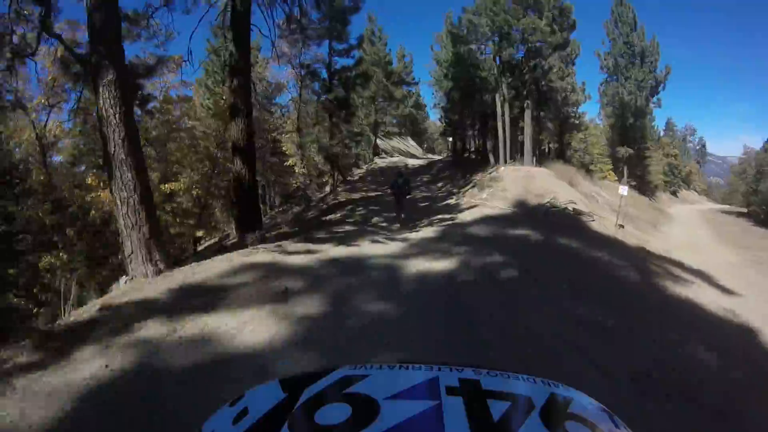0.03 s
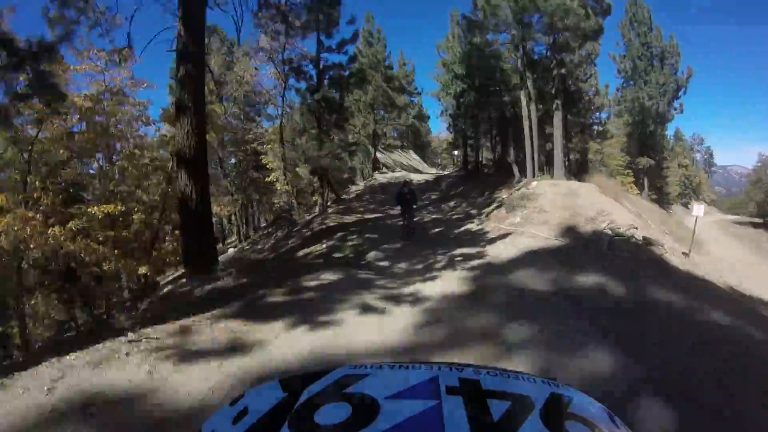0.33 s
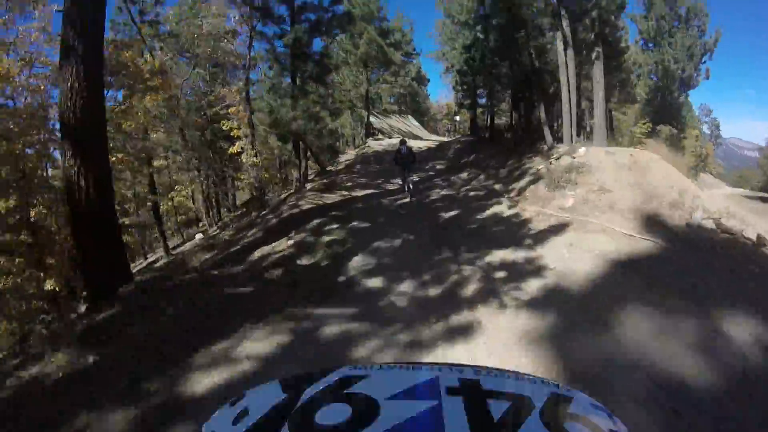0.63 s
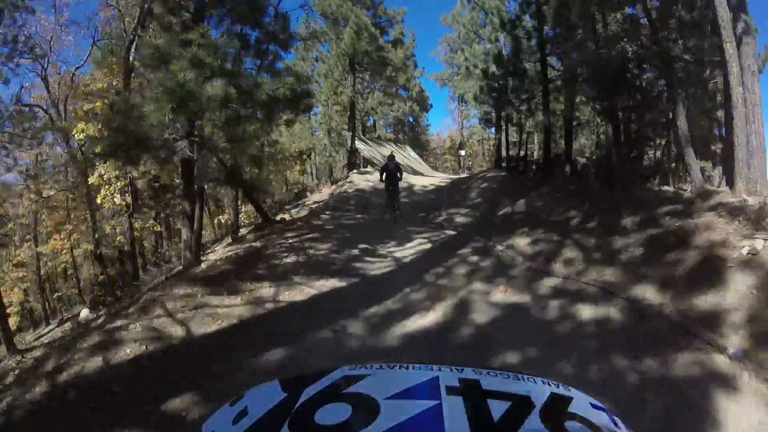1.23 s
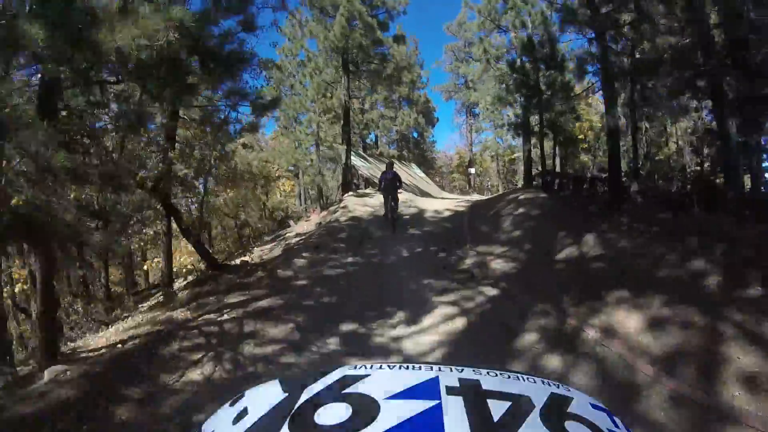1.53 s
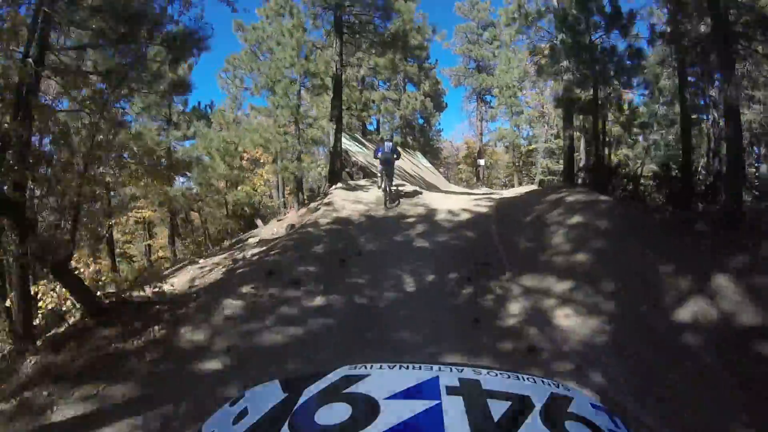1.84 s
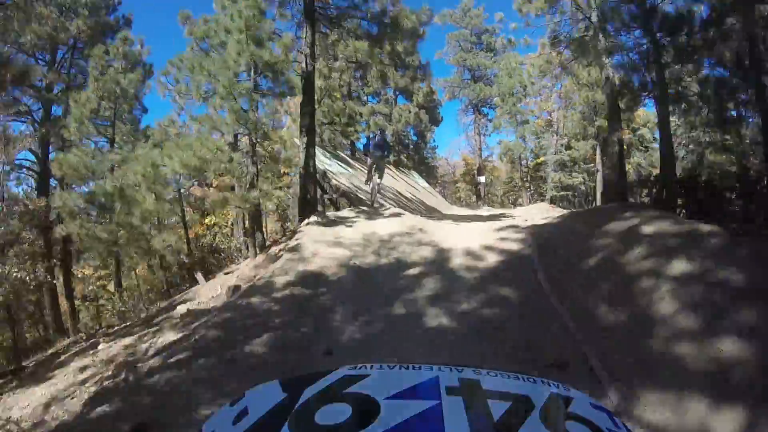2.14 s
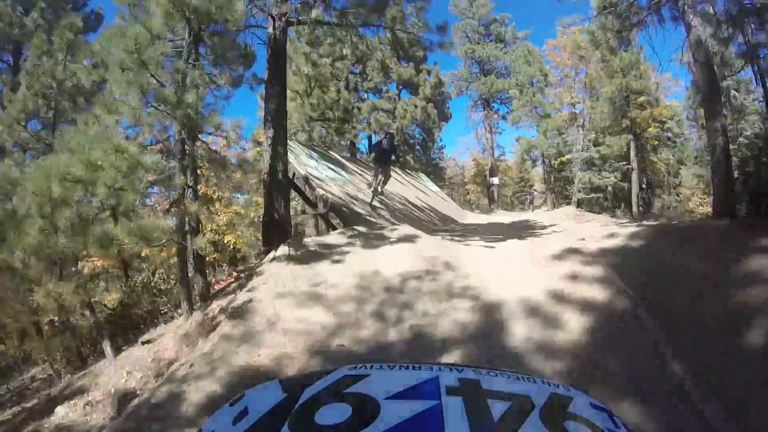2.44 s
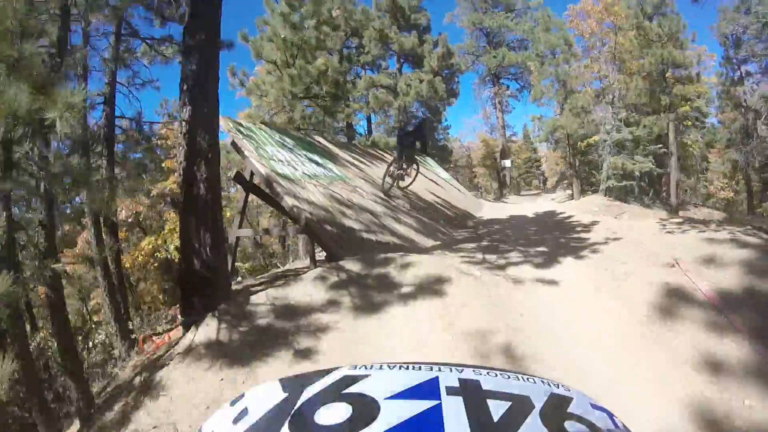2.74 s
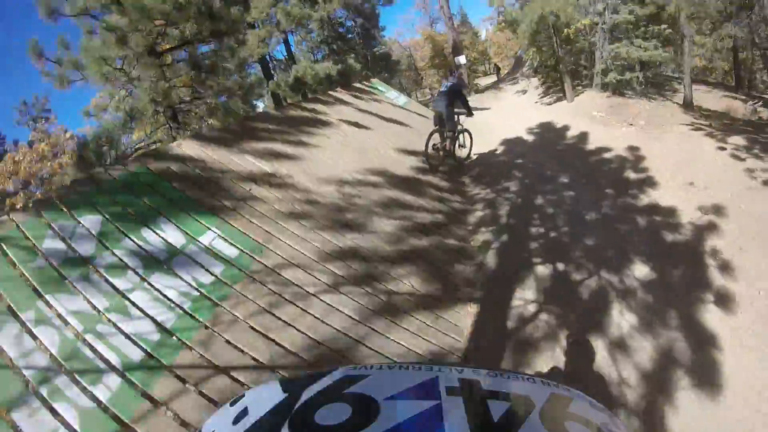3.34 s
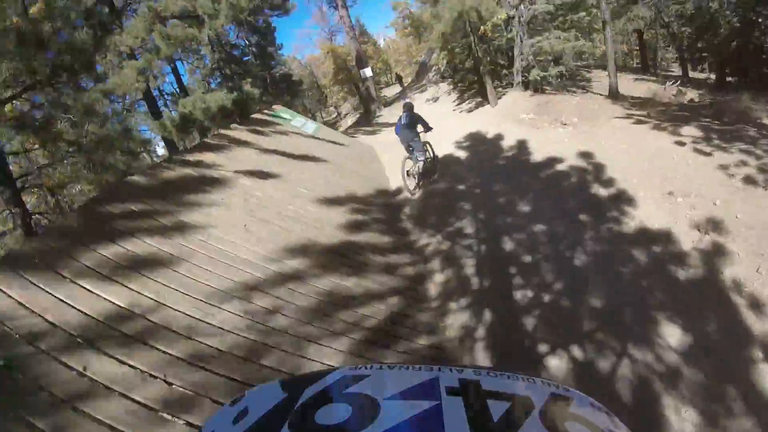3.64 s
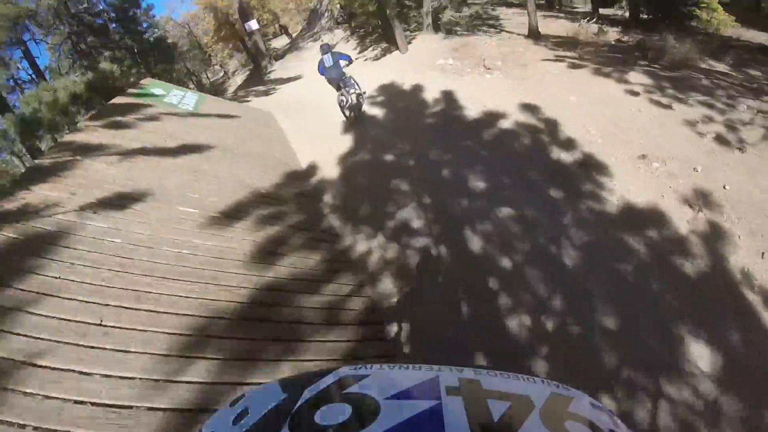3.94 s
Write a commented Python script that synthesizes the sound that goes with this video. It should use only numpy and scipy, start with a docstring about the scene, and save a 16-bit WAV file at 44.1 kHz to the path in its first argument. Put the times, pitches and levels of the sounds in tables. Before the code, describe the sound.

Mountain bike tyres rush over gritty dirt from the start, heard from the rider's helmet with buffeting wind, low rumbling and scattered plastic ticks. A bump thuds and rattles at about 1 second. The tyre rush dips after 2.2 seconds and dies away by 3, as the bike rolls onto a wooden ramp. Chain and frame then rattle in short bursts until nearly 4 seconds, with gusts and dull thuds.

```python
"""Mountain bike tyres crush grit on a fast run down a dirt trail, heard by a cased camera on a helmet.
The many tiny impacts merge into a rush, coloured by the resonances of the case. Turbulent wind buffets
the case, the rough trail drives the helmet into a low boom, and the plastic mount ticks. As the bike
rolls onto a wooden ramp the rush dies away, and chain and frame rattle in short bursts on the planks."""
import sys
import numpy as np
from scipy import signal
from scipy.fft import rfft, irfft
from scipy.io import wavfile
from scipy.ndimage import uniform_filter1d

SR = 44100
rng = np.random.default_rng(int(sys.argv[2]) if len(sys.argv) > 2 else 0)


def int16_out(signal):
    """Quantize to a 16-bit WAV file."""
    q = np.round(np.clip(np.atleast_2d(signal).T, -1, 1) * 32767)
    wavfile.write(sys.argv[1], SR, q.astype(np.int16))


N = 176400

# envelope of the tyre rush: time_s, level_db
RUSH_LEVEL = [(0, -36.5), (.17, -36.5), (.22, -32.5), (.27, -36), (.38, -35.5), (.44, -32.5), (.52, -34.5),
              (.578, -37.5), (.598, -30), (.628, -30.5), (.648, -39), (.67, -30.5), (.725, -35.5),
              (.755, -31), (.81, -34.5), (.92, -33.5), (.97, -34.5), (1.05, -34.5), (1.27, -36),
              (1.38, -31.5), (1.495, -36), (1.52, -32), (1.59, -32.5), (1.66, -32.5), (1.84, -33),
              (1.96, -36), (2.05, -34), (2.18, -36), (2.22, -43.5), (2.32, -42), (2.37, -37.5), (2.53, -36),
              (2.62, -39), (2.88, -45), (3.02, -57), (4, -86)]
# resonances of the camera case: frequency_hz, gain_db
CASE_RESPONSE = [(200, -19.5), (950, -20), (1100, -19.5), (1320, -7.5), (1520, -10.5), (1880, -15.5),
                 (2040, -13.5), (2220, -11), (2390, -10), (2500, 0), (2610, 4), (2740, -1.5), (2900, -12),
                 (3130, -6), (3350, -8.5), (3600, -4.5), (3850, -12.5), (4030, -8.5), (4260, -24),
                 (4580, -25), (4820, -34), (5050, -29), (5450, -37.5), (5880, -28.5), (6220, -19.5),
                 (6400, -30), (6620, -27.5), (7100, -34.5), (8100, -32.5), (8800, -53), (11000, -70),
                 (15000, -77)]


def tyre_rush():
    """Shot noise: random grit impacts and dust hiss excite the case's resonances; louder is brighter."""
    grains_per_s, spread_db, grit_share = 2500, 3, 0.61
    impacts = (rng.random(N) < grains_per_s / SR) * np.sign(noise())
    grit = impacts * undb(spread_db * np.minimum(rng.exponential(size=N), 4))
    excitation = np.sqrt(grit_share) * unit_rms(grit) + np.sqrt(1 - grit_share) * noise()
    level_db = envelope(RUSH_LEVEL)
    flutter_db = 0.76 * wander(rate_hz=56.5)  # uneven ground
    rush = colour(excitation * undb(level_db + flutter_db), CASE_RESPONSE)
    crossover_hz = 2930
    low = signal.sosfiltfilt(signal.butter(3, crossover_hz, fs=SR, output="sos"), rush)
    treble_db = 0.63 * (level_db + 27) + 2.5 * wander(rate_hz=31)  # follows the level and flickers
    return low + (rush - low) * undb(treble_db)


# envelope of the wind buffeting: time_s, level_db
BUFFET_LEVEL = [(0, -38.5), (.2, -32.5), (.4, -34), (.55, -27.5), (.73, -26.5), (.78, -30.5), (.84, -25.5),
                (.94, -34), (1.55, -31.5), (1.93, -35), (2.05, -39.5), (2.55, -42.5), (3.08, -41),
                (3.2, -35), (3.32, -22.5), (3.44, -37), (3.57, -37), (3.635, -25), (3.72, -33.5),
                (3.79, -34), (4, -37)]
# spectrum of the buffeting: frequency_hz, gain_db
BUFFET_SPECTRUM = [(8, -11), (15, 2), (28, -2), (45, -6), (70, -13.5), (120, -24), (220, -30), (320, -46),
                   (700, -54.5), (2000, -81.5)]
# spectrum of the smooth air and rolling noise: frequency_hz, gain_db
AIR_SPECTRUM = [(150, 2), (300, 0.5), (600, -5), (950, -7), (1300, 2), (1800, -4), (2300, -6), (2620, -1.5),
                (3000, -9.5), (4000, -17.5), (6500, -23.5), (9500, -31.5), (15000, -45.5)]
# easing of that noise as the bike slows on the ramp: time_s, gain_db
PACE_GAIN = [(0, -1), (.6, -1), (1.8, 0), (2.25, -1), (3, -4.5), (4, -6.5)]


def wind():
    """Turbulence: quick, low gusts press on the case over a hiss of air that falls with the pace."""
    gust_db = 2.5 * wander(rate_hz=7)
    buffet = steady(colour(noise(), BUFFET_SPECTRUM), span_s=0.16) * undb(envelope(BUFFET_LEVEL) + gust_db)
    hiss_db = -47 + envelope(PACE_GAIN) + 1.7 * wander(rate_hz=45)
    return buffet + colour(noise(), AIR_SPECTRUM) * undb(hiss_db)


# envelope of the trail vibration in the helmet: time_s, level_db
BOOM_LEVEL = [(0, -40.5), (.38, -40.5), (.56, -31), (.68, -31), (.73, -36.5), (.8, -32), (.92, -33),
              (1.1, -38), (1.22, -29), (1.3, -38.5), (1.39, -33.5), (1.47, -41), (1.53, -25.5), (1.6, -41),
              (1.69, -25.5), (1.74, -33.5), (1.84, -22.5), (1.9, -33.5), (2.03, -35), (2.29, -42),
              (2.36, -30.5), (2.42, -35.5), (2.47, -32.5), (2.55, -40), (2.61, -32.5), (2.8, -43.5),
              (3.07, -49), (3.17, -38.5), (3.31, -40), (3.54, -51), (3.63, -42), (3.82, -59)]
# low resonances of the helmet: frequency_hz, gain_db
HELMET_RESPONSE = [(15, -38), (40, -19.5), (53, -1.5), (66, -16), (78, -4), (95, 5), (110, -15), (140, -29),
                   (300, -47.5), (2000, -84.5)]
# higher resonances of its shell: frequency_hz, gain_db
SHELL_RESPONSE = [(60, -33.5), (138, -10.5), (154, -1), (166, -1), (184, -10.5), (218, -15.5), (233, -4),
                  (250, -18), (275, -15), (340, -25.5), (2000, -67)]
# bumps that thud through the helmet: start_s, level_db, pitch_hz, decay_s
THUDS = [(0.9595, -15.5, 110, 0.0085), (3.7173, -19, 121, 0.008), (3.294, -20.5, 76, 0.014),
         (3.617, -31, 240, 0.0067), (3.632, -25, 34, 0.012)]


def helmet():
    """Forced vibration: the trail drives a boom and a shell hum; single bumps decay as damped sines."""
    out = steady(colour(noise(), HELMET_RESPONSE), span_s=0.0516) * undb(envelope(BOOM_LEVEL))
    hum_db = -43 + 2.34 * envelope(PACE_GAIN)
    out += steady(colour(noise(), SHELL_RESPONSE), span_s=0.22) * undb(hum_db)
    t = np.arange(N // 20) / SR
    for start_s, level_db, pitch_hz, decay_s in THUDS:
        add(out, start_s, undb(level_db) * damped_sine(t, pitch_hz, decay_s))
    return out


# ticks of the camera mount: start_s, level_db, pitch_hz
TICKS = [(0.039, -17, 1270), (0.343, -15.5, 1630), (0.3995, -20.5, 1690), (.5088, -15.5, 1850),
         (0.7466, -13.5, 1760), (0.7517, -16, 1720), (0.839, -15, 1560), (0.9546, -17, 1500),
         (0.9604, -19, 1480), (0.9685, -16, 1300), (0.986, -15.5, 1420), (1.161, -15, 1910),
         (1.392, -10, 1890), (1.629, -22, 1790), (2.1861, -17, 1700), (2.3491, -21, 1740),
         (2.5546, -18.5, 1700), (2.669, -20, 1700), (2.731, -21, 1620), (2.9836, -25.5, 1590),
         (3.0176, -23, 1600), (3.114, -28, 1590), (3.5582, -29.5, 1540), (3.884, -29.5, 1670),
         (3.9387, -28.5, 1820)]
# resonances of the mount: frequency_hz, gain_db
MOUNT_RESPONSE = [(300, -21), (1000, -15.5), (1300, 5), (1550, -1), (1870, 3.5), (2150, -9), (2600, -1),
                  (3200, -11), (6000, -29.5), (15000, -39)]


def mount_ticks():
    """Impact and rebound: the plastic rings for a few heavily damped cycles, then again more weakly."""
    out, t = np.zeros(N), np.arange(N // 200) / SR
    scatter = rng.uniform(-1.14, 1, (len(TICKS), 3))
    for (start_s, level_db, pitch_hz), (stretch, lag, detune) in zip(TICKS, scatter):
        rise_s = 0.0003 * np.exp(0.25 * stretch)
        pulse = undb(level_db - 4.5) * t / rise_s * np.exp(1 - t / rise_s)
        add(out, start_s, pulse * np.sin(2 * np.pi * pitch_hz * t))
        rebound_s = start_s + 0.00153 * np.exp(0.45 * lag)
        rebound_hz = pitch_hz * np.exp(0.25 * detune)
        add(out, rebound_s, undb(-4.5) * pulse * np.sin(2 * np.pi * rebound_hz * t))
    return unit_rms(colour(out, MOUNT_RESPONSE)) * out.std()


# chain and frame contacts: start_s, level_db, sharpness_db
CONTACTS = [(0.157, -33, 5.5), (.542, -30.5, -3), (.963, -26, 2), (0.97, -26, -15), (0.978, -24, -13),
            (2.886, -32, -6), (3.0243, -25.5, -15), (3.1236, -26, 1.5), (3.128, -25, -25),
            (3.1593, -38, -8), (3.1631, -23, -17), (3.1672, -24.5, -22), (3.1705, -26, -14),
            (3.1733, -26.5, -16), (3.2214, -29.5, -1.5), (3.2555, -32, -9), (3.2898, -26.5, -20),
            (3.2954, -25.5, -2), (3.3436, -35, -7), (3.355, -27, -15), (3.3593, -25.5, -12),
            (3.475, -35.5, -14), (3.5028, -33.5, -24), (3.6118, -26, -16), (3.6161, -26, 2),
            (3.6243, -28.5, -20), (3.695, -26, -15), (3.7024, -29, -12), (3.7078, -28, -16),
            (3.757, -33, 2), (3.979, -37, -11)]
# spectrum of a contact's dry clack: frequency_hz, gain_db
CLACK_SPECTRUM = [(200, -22), (500, -14.5), (900, -13), (1250, 1.5), (1700, 1), (2100, -1.5), (2700, 4),
                  (2950, -9), (3300, -6), (3850, -19), (4100, -9), (4450, -23), (15000, -59)]
# spectrum of its sharp edge: frequency_hz, gain_db
EDGE_SPECTRUM = [(800, -32), (2400, -3), (3300, 4.5), (4400, -11.5), (5050, -7), (5600, -11.5), (6130, 1),
                 (6950, -19), (7500, -10), (8300, -25), (15000, -60)]
# modes of the frame and chain: pitch_hz, level_db, decay_s
FRAME_MODES = [(1294, 4, 0.0033), (1510, -2, 0.0046), (1707, 0, 0.0031), (1860, -1.5, 0.0027),
               (2290, -6, 0.0043), (2646, -1.5, 0.0036), (3530, -13, 0.0039), (4050, -17, 0.0031)]
CONTACT_RISE_S = 0.00066


def rattle():
    """Modal ringing: each contact excites the frame's modes in its own mix; hard ones ring on."""
    clack, edge, ring = np.zeros((3, N))
    t = np.arange(N // 40) / SR
    attack = 1 - np.exp(-t / CONTACT_RISE_S)
    mode_hz, mode_db, mode_decay_s = np.array(FRAME_MODES).T[:, :, None]
    scatter = rng.standard_normal((len(CONTACTS), 3, len(FRAME_MODES), 1))
    for (start_s, level_db, sharpness_db), (mix, detune, polarity) in zip(CONTACTS, scatter):
        edge_db = level_db + sharpness_db
        add(clack, start_s, undb(level_db) * crack(decay_s=0.0018))
        add(edge, start_s, undb(edge_db) * crack(decay_s=0.0011))
        weights = np.sign(polarity) * undb(mode_db + 2.5 * mix)
        weights /= np.linalg.norm(weights)
        modes = weights * damped_sine(t, mode_hz * (1 + 0.022 * detune), mode_decay_s)
        add(ring, start_s, undb(level_db) * attack * modes.sum(0))
        add(ring, start_s, undb(edge_db - 12) * damped_sine(t, pitch_hz=2445, decay_s=0.012))
    return undb(-9.5) * colour(clack, CLACK_SPECTRUM) + undb(-13) * colour(edge, EDGE_SPECTRUM) + ring


def crack(decay_s):
    """Impact transient: a noise burst with a weak tail, its mid-band energy set by its length."""
    tail_db, tail_s, band_hz = -21.5, 0.007, (1100, 3500)
    t = np.arange(N // 80) / SR
    attack = 1 - np.exp(-t / CONTACT_RISE_S)
    shape = attack * (np.exp(-t / decay_s) + undb(tail_db) * np.exp(-t / tail_s))
    burst = rng.standard_normal(len(t)) * shape
    mid_band = signal.sosfilt(signal.butter(2, band_hz, "band", fs=SR, output="sos"), burst)
    return burst * shape.std() / mid_band.std()


# light touches of metal: start_s, level_db
CHINKS = [(2.651, -56.5), (3.821, -60.5)]
# their thin, bright spectrum: frequency_hz, gain_db
CHINK_SPECTRUM = [(1000, -38), (5800, -16), (6500, 3), (8000, -8), (10200, -9), (11200, -18), (15000, -32)]


def metal_chinks():
    """Two-stage decay: small metal parts touch with a spike of noise, then sizzle briefly."""
    spike_s, tail_s, tail_db = 0.0017, 0.052, -9
    amplitude, t = np.zeros(N), np.arange(N // 20) / SR
    shape = np.exp(-t / spike_s) + undb(tail_db) * np.exp(-t / tail_s)
    for start_s, level_db in CHINKS:
        add(amplitude, start_s, undb(level_db) * shape)
    return colour(amplitude * noise(), CHINK_SPECTRUM)


def undb(db):
    """Decibels to amplitude ratio."""
    return 10 ** (np.asarray(db) / 20)


def unit_rms(x):
    """Normalisation to rms 1."""
    return x / np.sqrt(np.mean(x ** 2))


def envelope(rows):
    """Linear interpolation of (time_s, value) rows."""
    return np.interp(np.arange(N) / SR, *np.array(rows).T)


def noise():
    """Gaussian white noise."""
    return rng.standard_normal(N)


def wander(rate_hz):
    """Random modulation: noise low-passed at rate_hz, with rms 1."""
    rolloff = 1 + (np.fft.rfftfreq(N, 1 / SR) / rate_hz) ** 4
    return unit_rms(irfft(rfft(noise()) / rolloff, N))


def damped_sine(t, pitch_hz, decay_s):
    """Free vibration of one mode."""
    return np.exp(-t / decay_s) * np.sin(2 * np.pi * pitch_hz * t)


def colour(x, response):
    """Minimum-phase filter shaped by (frequency_hz, gain_db) rows; white noise keeps its power."""
    hz, db = np.array(response).T
    log_hz = np.log(np.fft.rfftfreq(N, 1 / SR) + 1)
    gain = unit_rms(undb(np.interp(log_hz, np.log(np.sort(hz)), db)))
    cepstrum = irfft(np.log(gain), N)
    cepstrum[1:N // 2] *= 2  # folding onto positive time makes the filter causal
    cepstrum[N // 2 + 1:] = 0
    return irfft(rfft(x) * np.exp(rfft(cepstrum)), N)


def steady(x, span_s):
    """Division by the running rms evens out swells slower than span_s."""
    return x / np.sqrt(uniform_filter1d(x ** 2, int(span_s * SR)) + 1e-9)


def add(out, start_s, x):
    """Mix a short sound in at its time."""
    i = int(start_s * SR)
    out[i:i + len(x)] += x[:N - i]


def scene():
    """Superposition of all sources at one microphone."""
    return (tyre_rush() + wind() + helmet() + mount_ticks() + rattle() + metal_chinks())[None]


def record(dry):
    """Band limiting: the camera's sound opens after a brief silence and loses its highest treble."""
    silence_s, fade_s, cutoff_hz = 0.036, 0.00076, 14700
    fade_in = np.clip((np.arange(N) / SR - silence_s) / fade_s, 0, 1)
    return signal.sosfilt(signal.ellip(10, .2, 70, cutoff_hz, fs=SR, output="sos"), dry * fade_in)


dry = scene()
out = record(dry)
int16_out(out)
```